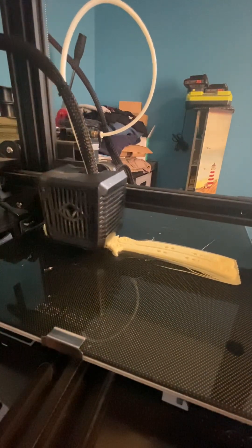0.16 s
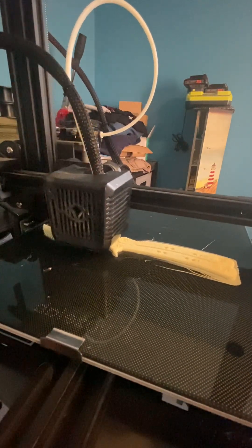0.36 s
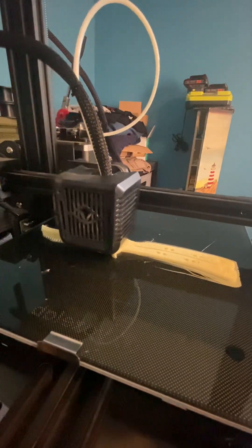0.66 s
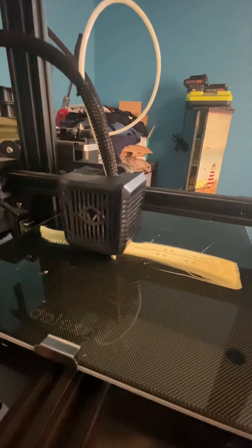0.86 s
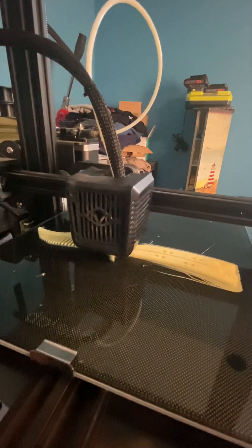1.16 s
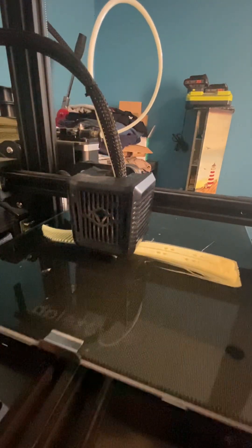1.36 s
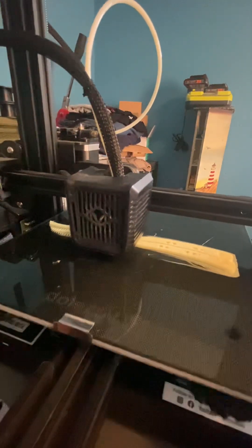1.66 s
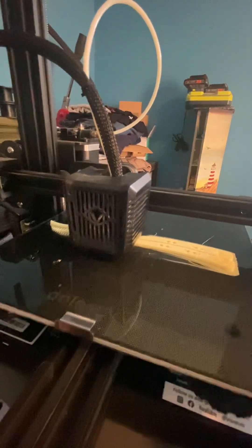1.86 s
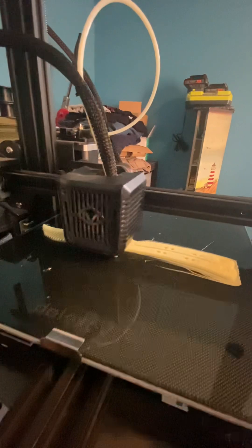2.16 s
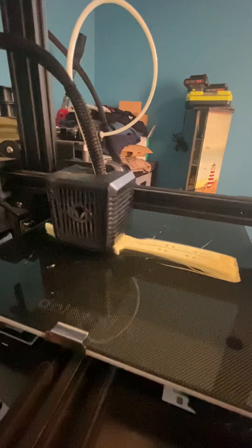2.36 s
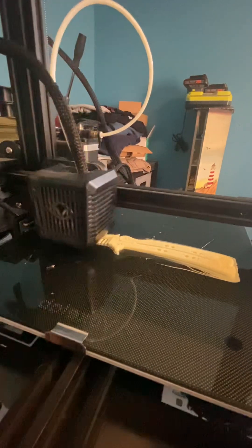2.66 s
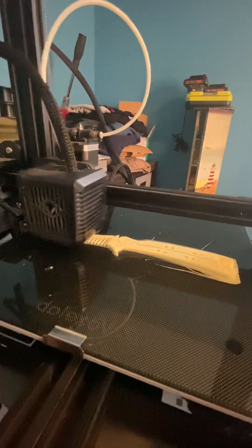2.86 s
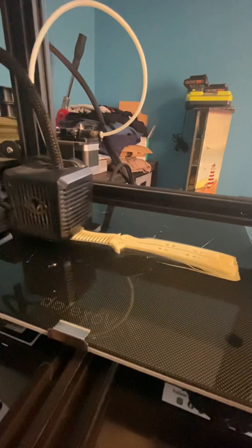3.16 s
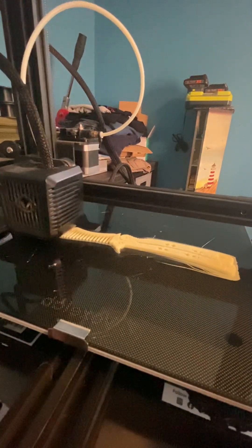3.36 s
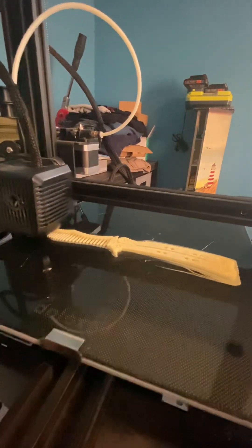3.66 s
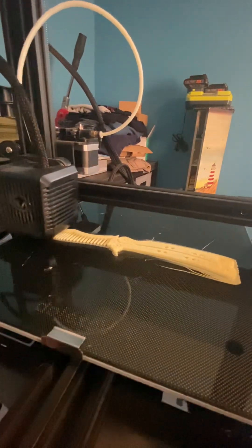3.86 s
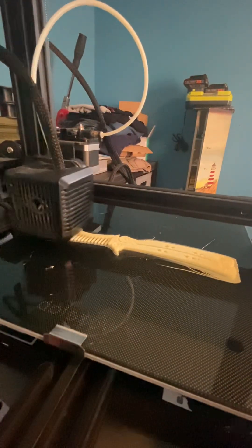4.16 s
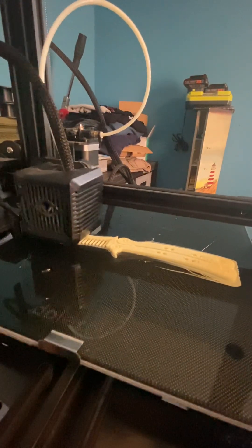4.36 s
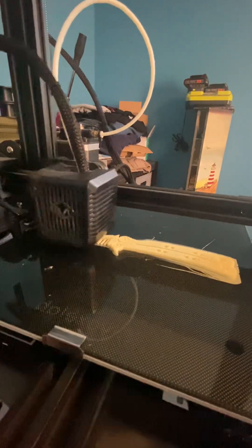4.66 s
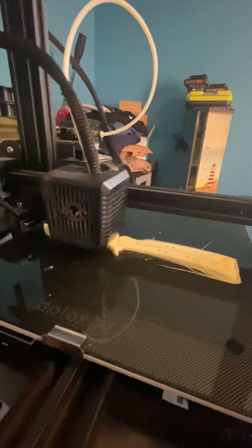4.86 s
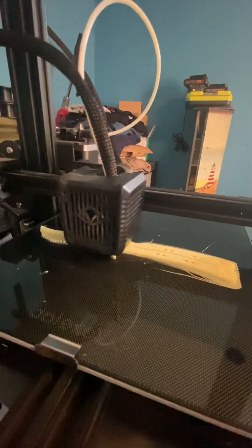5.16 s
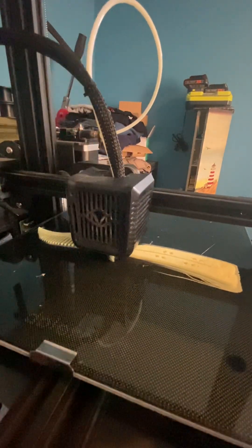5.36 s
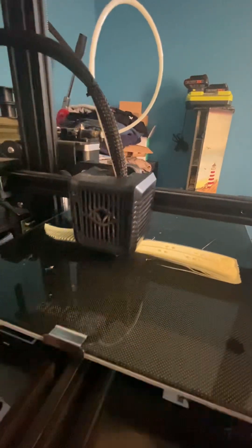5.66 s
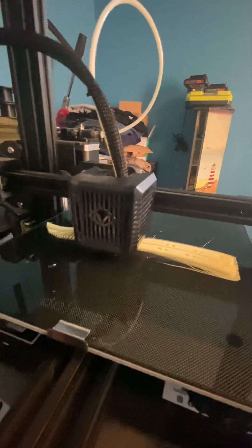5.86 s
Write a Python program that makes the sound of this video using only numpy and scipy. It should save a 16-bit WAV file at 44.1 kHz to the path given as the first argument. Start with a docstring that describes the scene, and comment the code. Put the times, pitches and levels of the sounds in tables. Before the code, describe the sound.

Close to a desktop 3D printer in a room, small cooling fans hold steady, slightly fluttering whines over continuous rushing air. As the print head slides away and back, a narrow airy band rises and falls gently in pitch. Beneath, the frame rumbles in separate runs, motors hum low notes, and soft dull bumps mark changes of direction. A phone just in front of the bed hears it in stereo.

```python
"""Desktop 3D printer at work

Heard from a phone just in front of the bed. Three small fans whine: harmonics of their rotation, fluttering.
Shaped noise is the air rushing through the head's shroud; the head slides left and back, its grille turning
away for a moment, and a narrow band of air rises and falls in pitch with it.
The frame rumbles, sways and bumps softly (noise and decaying sines); axis motors sing, low whirrs set in, mains hums."""
import sys
import numpy as np
from scipy import signal
from scipy.fft import rfft, irfft, next_fast_len
from scipy.io import wavfile

SR = 44100
rng = np.random.default_rng(int(sys.argv[2]) if len(sys.argv) > 2 else 0)


def store_wav(level_fs):
    """Save 16-bit WAV to argv[1]."""
    pcm = np.round(np.clip(np.atleast_2d(level_fs), -1, 1) * 32767)
    wavfile.write(sys.argv[1], SR, pcm.T.astype(np.int16))


N = 265041

# Blower tones: multiple of shaft speed, mean level/dB, left minus right/dB, flutter share, share of swell
BLOWER_TONES = [(3, -63.5, 0, .2, 0.097), (8, -47.3, -6.5, 0.088, .21), (9, -45, -1.5, 0.14, 1),
                (18, -66, -4, 0.28, .3)]
# Blower shaft speed: t/s, f/Hz
BLOWER_SHAFT_HZ = [(0, 80.94), (.8, 80.81), (1.6, 80.91), (4.2, 80.9), (5.2, 81.02), (6, 81.01)]
# Blower swell, used relative to its mean: t/s, level/dB
BLOWER_SWELL_DB = [(0, -44.5), (.6, -46.5), (1.5, -43.5), (2.05, -45.5), (2.4, -42), (2.8, -45.5),
                   (3.9, -45.5), (4.4, -43.5), (4.8, -44.5), (6, -47)]
# Heat-sink fan tones: multiple of blade rate, level before swell/dB, left minus right/dB, flutter share,
# change of left minus right with grille turned away/dB
SINK_TONES = [(1, -45, 1, 0.12, -3), (2, -47.8, -1, 0.061, -4), (3, -69, 6, 0.47, 2),
              (4, -70.5, 1, 0.51, 0)]
# Heat-sink fan swell: t/s, blade tone/dB, overtones/dB
SINK_SWELL_DB = [(0, -2, 1), (.9, 0, -0.5), (1.9, -0.5, -2), (2.6, -2, 0.5), (3.1, -2.5, -1.5),
                 (3.65, -3.5, -7), (4.1, -5.5, -3), (4.4, -3.5, 1.5), (5.1, -1.5, -.2), (6, -1, 1)]
# Heat-sink fan blade rate before wander: t/s, f/Hz
SINK_BLADE_HZ = [(0, 1166.4), (1.9, 1165.7), (3.05, 1163.6), (3.45, 1164), (3.9, 1160.8), (4.7, 1159.8),
                 (6, 1158.6)]
SINK_WANDER_RMS_HZ = .2
# Case fan tones: multiple of blade rate, level/dB, left minus right/dB, flutter share
CASE_TONES = [(1, -55.5, 1, 0.14)]
# Case fan blade rate: t/s, f/Hz
CASE_BLADE_HZ = [(0, 1189), (2.1, 1186.5), (3.3, 1190), (4.1, 1185), (4.8, 1183), (5.6, 1176)]

# Head on its rail: t/s, place (0 right, 1 far left)
HEAD_PLACE_CURVE = [(0, 0.5), (.5, .3), (1.4, 0), (2.2, 0.22), (3, 0.76), (3.65, 0.99), (4, .9),
                    (4.5, 0.68), (5.5, 0.014), (6, 0.086)]
TURN_POWER = 2.8  # grille turned away = place ** TURN_POWER
# Air rush before resonances: f/Hz, density/(dB per Hz)
AIR_DENSITY_DB = [(130, -92.5), (205, -73), (290, -74.5), (440, -77), (600, -70), (720, -72.5), (800, -76),
                  (1050, -78), (1350, -80), (2300, -78.5), (3600, -84), (4400, -85.5), (4950, -88.3),
                  (5400, -86), (6300, -86.5), (7700, -90.5), (9500, -90.5), (15700, -105)]
# Shroud and duct resonances: f/Hz, width/Hz, level above rush/dB
SHROUD_MODES = [(365, 38, 4.5), (513.6, 65, 6.3), (597, 100, 2), (846, 35, 3), (1980, 700, 3.5),
                (2880, 300, 2.5), (3340, 180, 1), (4160, 60, 2), (4630, 200, 2), (5510, 620, 4.5)]
# Change of air colour, grille fully away: f/Hz, gain/dB
SHADOW_DB = [(600, 0), (1000, -1), (1500, -0.5), (1780, -7), (2100, -3), (2350, -2), (2600, 0), (3100, 0.5),
             (3450, -2), (4200, 0), (4620, 1.5), (5000, 1), (5450, -4), (5850, -2), (6300, 1.5),
             (7000, -2.5), (10000, -4), (15000, -1)]
# Hollow between head and gantry: f at right/Hz, f at far left/Hz, width/Hz, left minus right/dB
HOLLOW_BAND = (1900, 2620, 300, 0.5)
# Hollow level before flutter: head place, level/dB rms
HOLLOW_LEVEL_DB = [(0, -53.5), (.35, -52.5), (.7, -49.8), (1, -53)]

# Frame and table rumble at 0 dB shaking: f/Hz, density/(dB per Hz)
RUMBLE_DENSITY_DB = [(22, -102), (33, -80), (50, -72.5), (66, -73), (90, -80.5), (130, -95), (230, -96),
                     (500, -115)]
# Axis motor drone at 0 dB shaking: f/Hz, density/(dB per Hz)
DRONE_DENSITY_DB = [(60, -100), (85, -81), (100, -74.5), (122, -70), (143, -74.5), (165, -85.5), (230, -83),
                    (500, -115)]
# Axis runs: start t/s, length/s, rumble above rest/dB, drone above rest/dB
AXIS_RUNS = [(.78, .67, 6.5, 2), (1.6, 1.25, 5, 4.5), (2.9, 0.94, 5, 4), (4.2, 0.85, 4, 0.5),
             (5.151, 0.4, 5, 3), (5.85, 0.28, 6.5, 5)]
REST_DB, RUN_RAMP_S = -3.5, 0.2
# Frame bumps: t/s, f/Hz, level before rise and decay/dB, t60/s
FRAME_BUMPS = [(0.715, 78, -28.5, 0.06), (0.736, 52, -34, 0.13), (5.236, 100, -37, .12),
               (5.274, 98, -37, .14), (5.394, 60, -36, 0.17)]
BUMP_RISE_S = 0.0026
# Jolts of the frame: t/s, level before rise, decay and flutter/dB
FRAME_JOLTS = [(.74, -48.5), (1.76, -53), (4.42, -53), (5.42, -51)]
SWAY_HZ, SWAY_T60_S, SWAY_RISE_S = 51.05, 2.6, .02
# Axis motor notes: start t/s, length/s, f/Hz, level before flutter/dB rms
AXIS_NOTES = [(1.05, .28, 114, -56.5), (2.3, 0.53, 64, -57), (2.52, 0.25, 113, -56), (2.85, 0.2, 122, -53),
              (3.0, .36, 99, -55), (3.38, .24, 124, -55.5)]
NOTE_RAMP_S = .08
# Whirrs: start t/s, length/s, f/Hz, width/Hz, level/dB rms
WHIRR_BANDS = [(4.1, 2.5, 350, 70, -55), (3.9, 1.3, 515, 60, -52)]
WHIRR_RAMP_S = .4
MAINS_HZ, UNDERTONE_HZ = 60, 141
# Mains hum: multiple of mains, level/dB, left minus right/dB, flutter share
HUM_TONES = [(2, -59.5, 0, 0.75), (4, -57.7, 0, 0.22)]
# Steady undertone: multiple, level/dB, left minus right/dB, flutter share
UNDERTONE_TONES = [(1, -63.5, 0, .4)]

# Microphone ports: f/Hz, likeness (0-1), left minus right/dB
PORT_PAIR = [(50, 0.65, -0.5), (230, 0.96, 0), (485, 0.86, -1.5), (590, 0.92, -2.5), (720, 0.87, 8),
             (960, 0.22, 0), (1280, 0.76, 1.5), (1890, 0.99, -.5), (2400, 0.71, -5.5), (3150, 0, -4),
             (3700, 0.36, -2), (4600, 0.62, -1.5), (7360, 1, 0.5), (9600, 0.95, 0.5), (10500, 0.96, -0.5),
             (13500, 1, 0)]
# Phase lead of left port: f/Hz, phase/rad
PORT_LEAD_RAD = [(2400, 0), (3500, .5), (5500, .9), (6400, 2.3), (7000, 2.95), (7900, 3.35), (8600, 4.2),
                 (10300, 6.2), (11500, 6.9), (13000, 9.2), (14400, 9.7), (15500, 12.2)]
TOP_HZ = 15700

SIDES = np.array([[1], [-1]])  # left, right
T_S = np.arange(N) / SR


def fans(away):
    """Rotation harmonics of three fans; the heat-sink fan's balance shifts as its grille turns away."""
    swell_db, = follow(BLOWER_SWELL_DB)
    swell_db = swell_db - swell_db.mean()
    blower_tones = [(k, db + share * swell_db, pan_db, flutter)
                    for k, db, pan_db, flutter, share in BLOWER_TONES]
    blower = whine(*follow(BLOWER_SHAFT_HZ), blower_tones, flutter_hz=4.6, stray=0.65)

    blade_db, overtone_db = follow(SINK_SWELL_DB)
    sink_tones = []
    for k, db, pan_db, flutter, shift_db in SINK_TONES:
        tone_swell_db = blade_db if round(k) == 1 else overtone_db
        sink_tones.append((k, db + tone_swell_db, pan_db + shift_db * away, flutter))
    sink_hz = follow(SINK_BLADE_HZ)[0] + SINK_WANDER_RMS_HZ * walk(2)
    sink = whine(sink_hz, sink_tones, flutter_hz=5.5, stray=0.58)

    case = whine(*follow(CASE_BLADE_HZ), CASE_TONES, flutter_hz=9, stray=0.55)
    return blower + sink + case


def airflow(away, surge_db):
    """Turbulence rings the shroud; its colour follows the head along the rail."""
    density_db, = colours(AIR_DENSITY_DB)
    for hz, width_hz, peak_db in SHROUD_MODES:
        density_db = density_db + peak_db / (1 + (2 * (bins() - hz) / width_hz) ** 2)
    spectrum = turbulence(density_db)
    shadow_db, = colours(SHADOW_DB)
    facing = irfft(spectrum, N)
    turned = irfft(spectrum * undb(shadow_db), N)
    rush = (1 - away) * facing + away * turned
    return rush * undb(0.37 + surge_db * walk(7.8))


def hollow(place):
    """Narrow band of rushing air, higher as the head nears the upright, loudest part of the way there."""
    right_hz, left_hz, width_hz, pan_db = HOLLOW_BAND
    level_db = np.interp(place, *np.transpose(HOLLOW_LEVEL_DB))
    centre_hz = right_hz + (left_hz - right_hz) * place
    return band(centre_hz, width_hz, pan_db, stray=0.15) * undb(level_db + .6 * walk(4))


def frame():
    """Moving axes shake the frame and their motors drone: shaped noise, louder in each run."""
    rumble_db, drone_db = shaking()
    rumble = irfft(turbulence(*colours(RUMBLE_DENSITY_DB)), N) * undb(rumble_db)
    drone = irfft(turbulence(*colours(DRONE_DENSITY_DB)), N) * undb(drone_db)
    return rumble + drone


def shaking():
    """Rumble and drone gain/dB: ramps up with each axis run, holds, ramps down."""
    gain_db = REST_DB
    for start_s, length_s, *rise_db in AXIS_RUNS:
        gain_db = gain_db + np.outer(rise_db, gate(start_s, length_s, RUN_RAMP_S, .5))
    return gain_db


def bumps():
    """Axes bump the frame as they turn round: short decaying sines."""
    return sum(ring(s, hz, db, t60_s, BUMP_RISE_S) for s, hz, db, t60_s in FRAME_BUMPS)


def sway():
    """Jolts swing the whole frame at its lowest mode, which dies away slowly and unevenly."""
    swing = sum(ring(s, SWAY_HZ, db, SWAY_T60_S, SWAY_RISE_S) for s, db in FRAME_JOLTS)
    return swing * undb(2.5 * walk(9))


def motors():
    """A motor sings a low sine while its axis moves at an even speed."""
    out = np.zeros(N)
    for start_s, length_s, hz, db in AXIS_NOTES:
        note = np.sin(2 * np.pi * hz * T_S + rng.uniform(0, 2 * np.pi))
        out += np.sqrt(2) * undb(db) * gate(start_s, length_s, NOTE_RAMP_S, .5) * note
    return out * undb(1.5 * walk(6))


def whirr():
    """Faint low noise bands that set in as the head travels back."""
    return sum(band(np.full(N, hz), width_hz, 0, stray=0.1) * undb(db) * gate(s, length_s, WHIRR_RAMP_S, 0)
               for s, length_s, hz, width_hz, db in WHIRR_BANDS)


def hum():
    """Mains harmonics and a faint tone of steady pitch beside them."""
    mains = whine(np.full(N, MAINS_HZ), HUM_TONES, flutter_hz=4.4, stray=0.37)
    undertone = whine(np.full(N, UNDERTONE_HZ), UNDERTONE_TONES, flutter_hz=3, stray=0.3)
    return mains + undertone


def whine(hz, tones, flutter_hz, stray):
    """Harmonics of hz; each flutters, a little differently at each port."""
    turn_rad = 2 * np.pi * np.cumsum(hz) / SR
    out = np.zeros((2, N))
    for multiple, db, pan_db, flutter in tones:
        tone = np.exp(1j * (round(multiple) * turn_rad + rng.uniform(0, 2 * np.pi)))
        shared = complex_walk(flutter_hz)
        for channel, sign in enumerate((1, -1)):
            swing = 1 + flutter * (shared + stray * complex_walk(flutter_hz)) / np.sqrt(2)
            gain = np.sqrt(2) * undb(db + sign * pan_db / 2)
            out[channel] += gain * (tone * swing).real
    return out


def turbulence(density_db):
    """Left and right spectra of noise with the given dB per Hz, as the two ports pick it up."""
    likeness, balance_db = colours(PORT_PAIR)
    likeness = np.clip(likeness, 0, 1)
    lead_rad, = colours(PORT_LEAD_RAD)
    mid, side = rfft(rng.standard_normal((2, N)))
    pair = mid * np.sqrt(1 + likeness) + SIDES * side * np.sqrt(1 - likeness)
    gain = undb(density_db + SIDES * balance_db / 2)
    return pair * gain * np.exp(.5j * SIDES * lead_rad) * np.sqrt(SR) / 2


def band(hz, width_hz, pan_db, stray):
    """Narrow noise band whose centre may move, a little different at each port."""
    carrier = np.exp(2j * np.pi * np.cumsum(hz) / SR)
    shared = (carrier * complex_walk(width_hz / 2)).real
    apart = (carrier * complex_walk(width_hz / 2)).real
    return (shared + stray * SIDES * apart) * undb(SIDES * pan_db / 2)


def ring(start_s, hz, db, t60_s, rise_s):
    """Struck mode: a sine with a soft onset and exponential decay."""
    age_s = np.maximum(T_S - start_s, 0)
    envelope = undb(db - 60 * age_s / t60_s) * (1 - np.exp(-age_s / rise_s))
    return envelope * np.sin(2 * np.pi * hz * age_s)


def gate(start_s, length_s, ramp_s, edge):
    """Linear ramps up and down; edge is the value at start and end."""
    return np.clip(edge + np.minimum(T_S - start_s, start_s + length_s - T_S) / ramp_s, 0, 1)


def walk(rate_hz):
    """Smooth chance of spread 1 that moves about rate_hz times a second."""
    size = next_fast_len(N, real=True)
    hz = np.arange(size // 2 + 1) * SR / size
    y = irfft(rfft(rng.standard_normal(size)) / (1 + (hz / rate_hz) ** 2), size)[:N]
    return y / y.std()


def complex_walk(rate_hz):
    """Independent walks of the in-phase and quadrature parts."""
    return walk(rate_hz) + 1j * walk(rate_hz)


def follow(curve):
    """Columns of a time table, linearly interpolated to each sample."""
    s, *columns = np.transpose(curve)
    return [np.interp(T_S, s, c) for c in columns]


def colours(table):
    """Columns of a frequency table, interpolated over log f to each bin."""
    hz, *columns = np.transpose(table)
    return [np.interp(np.log(bins()), np.log(hz), c) for c in columns]


def bins():
    """Bin frequencies/Hz, floored at 1 for the logarithm."""
    return np.maximum(np.arange(N // 2 + 1) * SR / N, 1)


def undb(db):
    """Decibels to gain."""
    return 10 ** (np.asarray(db) / 20)


def scene():
    """Fans, air and frame together."""
    place = np.clip(*follow(HEAD_PLACE_CURVE), 0, 1)
    away = place ** TURN_POWER
    head = fans(away) + airflow(away, surge_db=0.5) + hollow(place)
    body = frame() + bumps() + sway() + motors()
    return head + body + whirr() + hum()


def record(dry):
    """The phone cuts the top: steep elliptic low-pass."""
    return signal.sosfilt(signal.ellip(10, .1, 80, TOP_HZ, fs=SR, output="sos"), dry)


dry = scene()
out = record(dry)
store_wav(out)
```